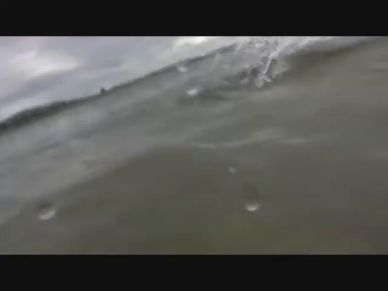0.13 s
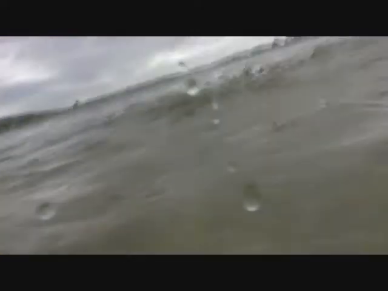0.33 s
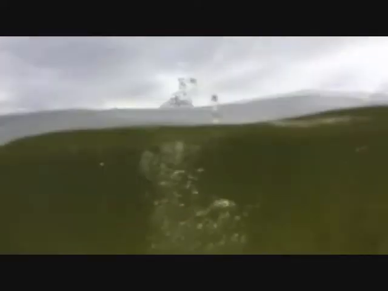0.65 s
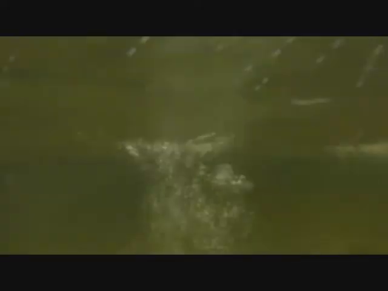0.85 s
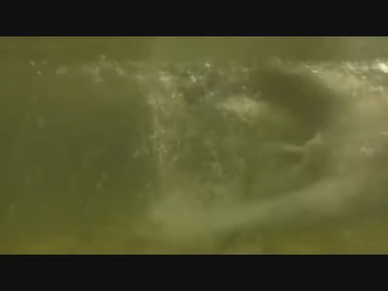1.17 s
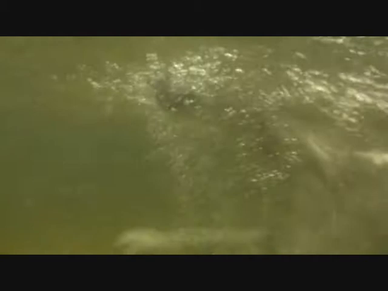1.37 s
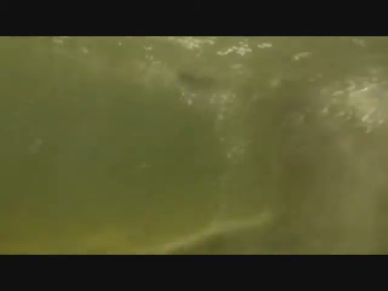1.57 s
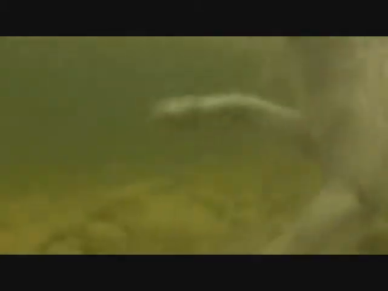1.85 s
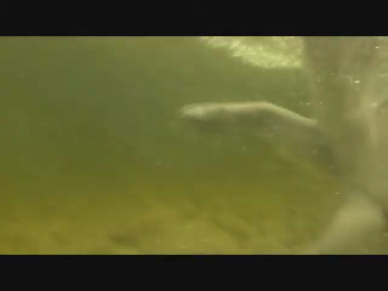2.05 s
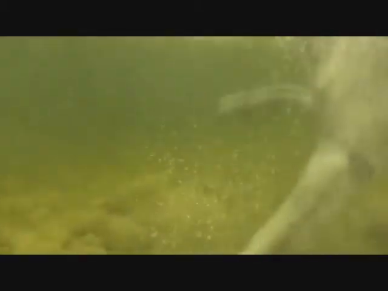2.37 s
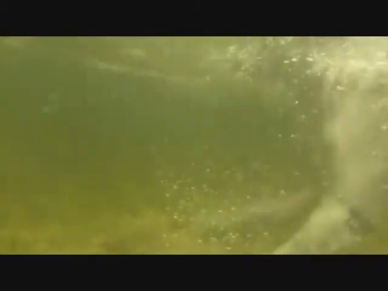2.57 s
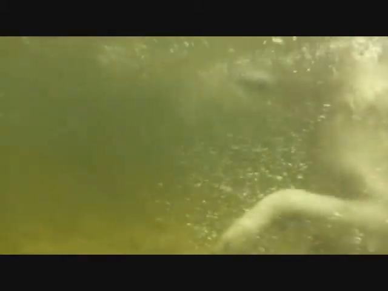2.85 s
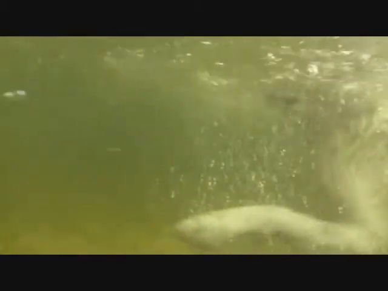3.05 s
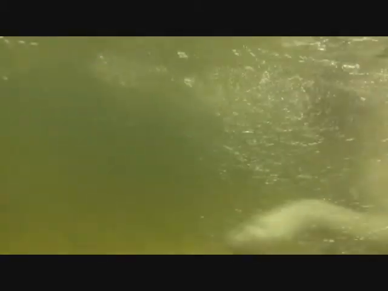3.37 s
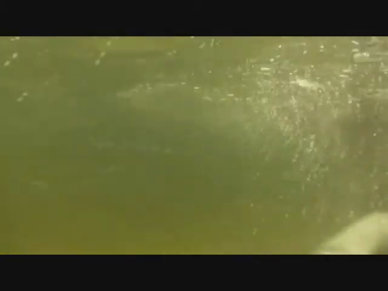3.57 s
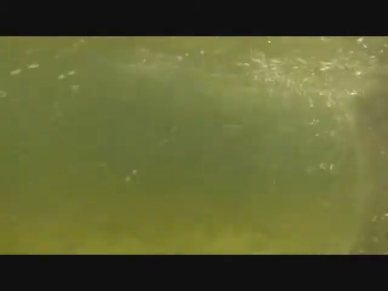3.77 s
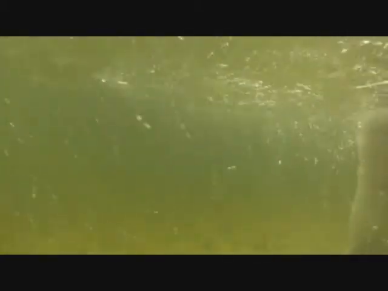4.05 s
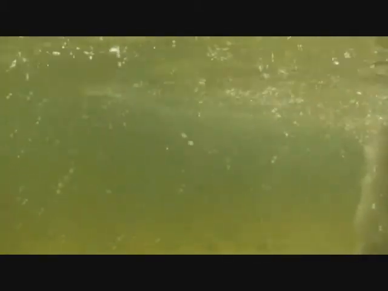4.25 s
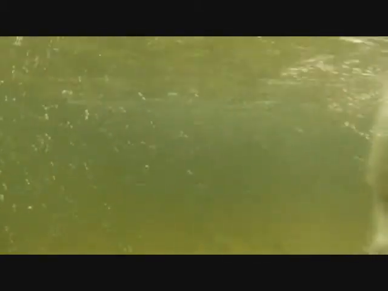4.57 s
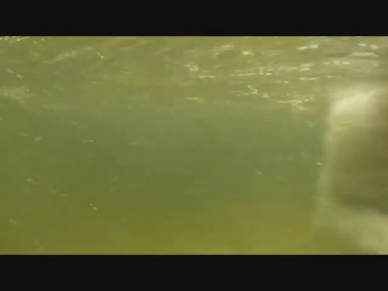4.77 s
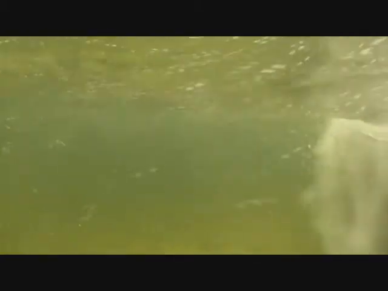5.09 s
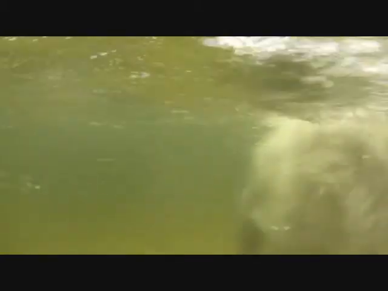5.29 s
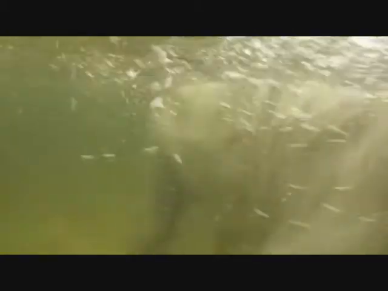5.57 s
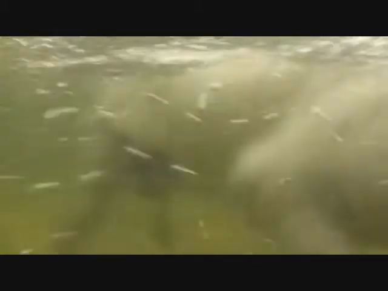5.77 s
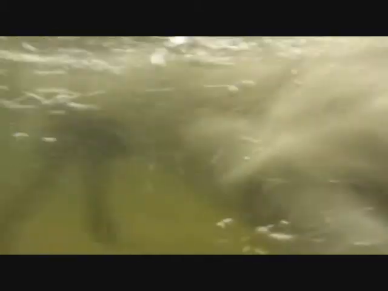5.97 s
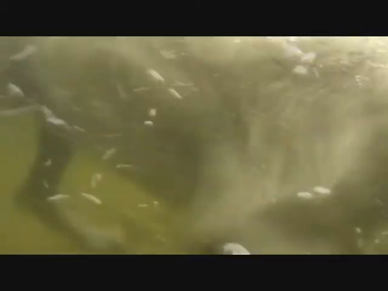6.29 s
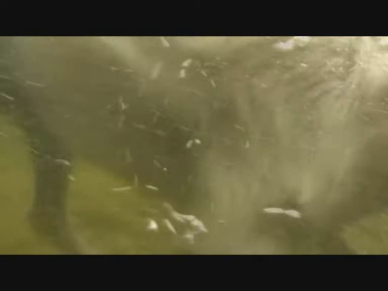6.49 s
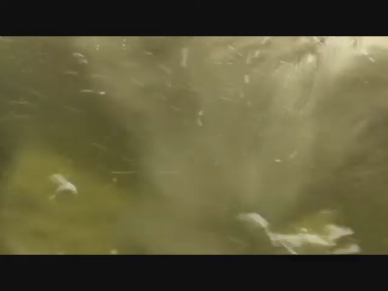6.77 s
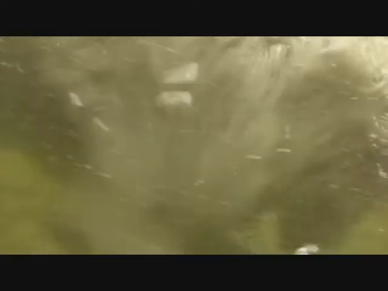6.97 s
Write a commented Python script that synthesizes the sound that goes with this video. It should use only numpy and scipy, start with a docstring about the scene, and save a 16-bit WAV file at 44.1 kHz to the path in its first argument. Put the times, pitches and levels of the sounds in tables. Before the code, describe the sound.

A small camera in a hard housing is dipped into a lake beside a paddling dog. Water slaps the case with hollow, overloaded thuds, then bubbles gulp and fizz as it submerges. One heavy knock follows, then a quiet stretch of dull water hiss with tiny ticks. Finally the dog churns close by, with knocks, gurgles and a very brief dropout.

```python
"""Under a lake surface, a small camera is dipped beside a paddling dog.
Slaps of water and paws knock its housing: noise pushes ring its modes until the input saturates.
Churned water drives the same modes with lumpy noise; large bubbles gulp as gliding sines, clouds of
small ones fizz and single ones tick. Noise and a thin whine lie beneath; the sound drops out once."""
import sys
import numpy as np
from scipy import signal
from scipy.fft import rfft, irfft, next_fast_len
from scipy.io import wavfile
from scipy.ndimage import uniform_filter1d

SR = 44100
rng = np.random.default_rng(int(sys.argv[2]) if len(sys.argv) > 2 else 0)


def materialize(psi):
    """Save the field psi as 16-bit PCM at rate SR to the path in sys.argv[1].

    A 1-D psi becomes a single channel; in a 2-D psi each row is a channel.
    """
    bounded = np.clip(np.atleast_2d(psi).T, -1, 1)
    quanta = np.round(bounded * 32767).astype(np.int16)
    wavfile.write(sys.argv[1], SR, quanta)


N = 314874

# housing modes, one list a part: small fittings, main wall, whole body on its grip, back door,
# side walls, lens port; columns: mode_hz, width_hz, left_gain, right_gain [linear]
HOUSING_MODES = [
    [(3070, 73, 0.36, 0.37), (3960, 130, 2, 1.06), (5000, 2000, 0.64, -0.076), (6600, 390, 0.14, 0.79)],
    [(767, 46.3, 1.0, 1.36), (737, 86, 0.38, 0.56), (866, 8.2, 0.086, 0.31), (637, 85, 0.2, 0.065)],
    [(161.7, 12.8, 0.53, 1.83)],
    [(391.5, 37, 0.73, 1.3), (422, 49, 0.55, 1.6)],
    [(1321, 60, 1, 1.17), (1114, 30, 0.024, 1.53), (1530, 26, 0.76, -0.53), (916, 58, 0.12, 0.061)],
    [(2667, 105, 1.4, 1), (2400, 42, 0.5, -0.91), (2220, 230, 0.082, 0.25), (3008, 51, 0.075, 0.62)],
]


def amp(db):
    """Decibels to linear amplitude."""
    return 10 ** (np.asarray(db) / 20)


def evened(x):
    """Scale to unit RMS."""
    return x / np.sqrt(np.mean(x ** 2) + 1e-20)


def read(points, hz):
    """Interpolate a curve over log frequency."""
    f, value = np.transpose(points)
    return np.interp(np.log(hz + 1), np.log(f + 1), value)


def add(mix, start_s, sound):
    """Mix a sound in at its start, cut at the end of the mix."""
    part = mix[:, round(start_s * SR):][:, :sound.shape[1]]
    part += sound[:, :part.shape[1]]


def kicks(rate_hz, spread_db):
    """Random impulses with exponentially distributed dB levels."""
    level_db = spread_db * np.minimum(rng.exponential(1, N), 5)
    return amp(level_db) * (rng.random(N) < rate_hz / SR)


def decaying(x, decay_s):
    """One-pole exponential decay after each impulse."""
    return signal.lfilter([1], [1, -np.exp(-1 / (decay_s * SR))], x)


def response(modes, size):
    """Push to both microphones: damped resonances, weak far above and below the part's modes."""
    hz = np.fft.rfftfreq(size, 1 / SR)
    ring = 0
    for mode_hz, width_hz, left, right in modes:
        damping = 1j * width_hz * hz
        ring = ring + np.array([[left], [right]]) * damping / (mode_hz ** 2 - hz ** 2 + damping)
    lowest_hz, highest_hz = np.min(modes, axis=0)[0], np.max(modes)
    rise = 1j * hz / (0.33 * lowest_hz)
    return ring / (1 + 1j * hz / (1.545 * highest_hz)) ** 3 * rise / (1 + rise)


def spray(pushes, size):
    """Filter each microphone's own push to the wide treble of spray."""
    # spray colour: freq_hz, gain_db
    colour = [(1500, -5.5), (3500, 6), (6000, 2.5), (9000, -5), (16000, -18.5)]
    gain_db = read(colour, np.fft.rfftfreq(size, 1 / SR))
    return irfft(rfft(pushes, size) * amp(gain_db), size)


def whine():
    """Electronics: thin steady sines at random phase."""
    # lines: freq_hz, left_rms_db, right_over_left_db
    lines = [(7854, -68, 2), (7881, -66, 2), (15735, -57, -5)]
    t, out = np.arange(N) / SR, 0
    for hz, db, right_db in lines:
        tone = np.sqrt(2) * np.sin(2 * np.pi * (hz * t + rng.random()))
        out = out + amp([[db], [db + right_db]]) * tone
    return out


def floor():
    """Still water and hiss: smooth noise, nearly unrelated at the two microphones."""
    # noise colour before levelling: freq_hz, relative_density_db
    colour = [(12, -67), (25, -0.5), (105, -4.5), (159, 4.5), (287, -4.5), (462, 2), (578, -9.5), (765, 0),
              (958, -14.5), (1780, -15), (7010, -20.5), (7630, -19.5), (14500, -24.5), (16300, -18.5)]
    level_db, size = -41.5, next_fast_len(N)
    a, b = rng.standard_normal((2, size))
    pair = np.array([a, b - 0.29 * a])
    gain = amp(read(colour, np.fft.rfftfreq(size, 1 / SR)))
    noise = irfft(rfft(pair) * gain, size)[:, :N]
    return amp(level_db) * amp([[-1.5], [1.5]]) * evened(noise)


def churn_levels():
    """Relative dB of the low walls, side walls and treble at every sample."""
    # churned water: time_s, relative_level_db, treble_over_level_db
    pressure = [(0, -37.5, 4.5), (.34, -44.5, 7), (.45, -17, 5.5), (.85, -30, 4.5), (.95, -41, 7.5),
                (1.1, -27.5, 8), (1.35, -22.5, -4), (1.6, -34, 6.5), (1.85, -38, -5.5), (2.15, -42.5, 4),
                (2.35, -31.5, -3), (2.55, -30.5, -11), (2.85, -47, 2.5), (5.0, -48.5, 4.5),
                (5.12, -35.5, 1), (5.3, -25.5, 0), (6.001, -31, -0.5), (6.45, -26, 3), (6.75, -25.5, 4.5),
                (7.14, -21, 1)]
    side_db, side_share = 1.5, 0.076  # side walls over low walls; their share of the treble
    time_s, *columns = np.transpose(pressure)
    level_db, treble_db = (np.interp(np.arange(N) / SR, time_s, c) for c in columns)
    return np.array([level_db, level_db + side_db + side_share * treble_db, level_db + treble_db])


def drops(size):
    """Small drops of spray: bursts of noise, each drop size in its own band."""
    band_hz, spectrum = np.fft.rfftfreq(size, 1 / SR), 0
    for hz in (2100, 2660, 3300, 3950, 5000, 6400, 8300, 11000):
        bursts = uniform_filter1d(decaying(kicks(35.0, 3.2), 0.006), 130)
        ticks = 0.2 + evened(bursts)
        band = np.exp(-(np.log((band_hz + 1) / hz) / 0.13) ** 2)
        spectrum = spectrum + rfft(ticks * rng.standard_normal((2, N)), size) * band
    return evened(spray(irfft(spectrum, size), size)[:, :N])


def churn():
    """Eddies press on the housing as noise lumped over a few milliseconds; each part hums with it."""
    low_db, side_db, high_db = churn_levels()
    part_db = [high_db - 22.5, low_db - 0.5, low_db - 20.5,
               low_db - 16.5, side_db - 7.0, high_db - 18.0]  # in the order of HOUSING_MODES
    size, out = next_fast_len(N), 0
    stirred = np.clip((low_db + 54.0) / 10, 0, 1)  # calm water presses evenly
    shared = kicks(40.0, 3.5)
    for modes, level_db in zip(HOUSING_MODES, part_db):
        own = kicks(60.0, 0.92)
        eddies = evened(decaying(shared + 13.0 * own, 0.0075))
        lumps = 0.5 + (1 - stirred) + stirred * eddies
        push = lumps * rng.standard_normal(N)
        hum = irfft(response(modes, size) * rfft(push, size), size)
        out = out + amp(level_db) * evened(hum[:, :N])
    return out + stirred * amp(high_db - 14.0) * drops(size)


def fizz(count=36):
    """Bubble cloud: each size rings some cycles at its own gliding pitch, often in quick strings."""
    # cloud colour: pitch_hz, relative_level_db
    colour = [(450, -7), (800, -6), (1300, 4.5), (1900, -6.5), (2700, -1), (4000, -18), (6500, -16.5)]
    level_db, out = churn_levels(), np.zeros((2, N))
    stirred = np.clip((level_db[0] + 50.5) / 11.0, 0, 1)  # calm water holds few bubbles
    for hz, (glide, side) in zip(np.geomspace(420, 7500, count), rng.random((count, 2))):
        turns = np.arange(int(90 * SR / hz)) * hz / SR
        ring = np.sin(2 * np.pi * turns * (1 + 0.00093 * (glide - 0.4) * turns))  # up or down
        blip = ring * np.exp(-turns / (4.6 + hz / 250.0)) * np.minimum(turns / 2.1, 1)
        wander = evened(uniform_filter1d(rng.standard_normal(N // 441 + 1), 8))  # 10 ms steps
        busy = amp(7.0 * wander).repeat(441)[:N]
        births = kicks(16.0 * stirred * busy, 4.56)
        band_db = level_db[np.searchsorted([930, 1700], hz)]
        sound = evened(signal.oaconvolve(births, blip)[:N]) * amp(band_db + read(colour, hz) - 20.5)
        apart = min(hz / 2580.0, 1)  # higher bubbles reach the two microphones unequally
        left = sound * amp(2.0 * apart * (side + 1.5))
        late = np.roll(sound, int(30 * apart * side))
        out += [left, late * amp(7.0 * apart * (1.0 - side))]
    return out


def bubbles():
    """A bubble bursts on the housing: a puff of noise around its pitch and a few cycles of ring."""
    # single bubbles: start_s, relative_level_db, pitch_hz
    bursts = [(0.199, -31, 2770), (0.23, -17.5, 4600), (1.809, -22, 1880), (1.9, -15.5, 1460),
              (1.95, -22, 1400), (2.399, -25, 3180), (2.62, -26, 5500), (0.879, -11, 3200),
              (1.069, 2, 3130), (1.555, -13, 2970), (2.382, -30, 3560), (2.619, -25, 2350),
              (3.802, -30, 8200), (3.836, -32.5, 2620), (4.469, -35, 7600), (4.494, -33, 5020),
              (4.83, -33.5, 4000), (5.393, -14.5, 5130), (5.23, -10, 2204), (5.541, -10.5, 3270),
              (6.041, -13.5, 2640), (6.146, -17, 2730), (6.183, -14, 3920), (6.568, -14, 3820),
              (1.179, -5, 2650), (1.235, -4, 7620), (1.287, -16, 2700), (1.452, 1, 1860),
              (1.461, -8.5, 4970), (1.53, -14, 2680), (1.61, -14, 2720), (1.637, -2.5, 2610),
              (1.371, -10, 3300), (1.68, -22, 4600), (1.746, -14.5, 2070), (1.773, -19, 2500),
              (1.886, -17.5, 1630), (2.3625, -33, 4000), (2.3994, -19.5, 2020), (2.4344, -24, 1880),
              (2.655, -21.5, 2520), (3.0609, -29.5, 7860), (3.0734, -14.5, 5050), (3.1033, -19, 1850),
              (3.1507, -17.5, 4760), (3.238, -22, 2840), (3.298, -21.5, 3250), (3.6494, -27, 3700),
              (3.681, -29, 6400), (3.703, -22.5, 7280), (4.04, -19.5, 2713), (4.655, -21.5, 4190),
              (5.052, -29, 4130), (5.348, -11, 3900), (5.435, -13, 1835), (5.51, -12.5, 2720),
              (5.715, 0, 3200), (5.987, -9, 2580), (6.0757, -12, 2310), (6.216, -14, 3760),
              (6.372, -19.5, 2720), (6.3981, -19, 2750), (6.5964, -5, 3860), (6.343, -19, 3980),
              (6.532, -13, 3800), (6.548, -18, 3860), (6.615, -13, 5040), (6.672, -3, 2600),
              (6.709, -16, 3700), (6.865, -2.5, 4170)]
    size, rise_s, ring_s, puff_s = 2048, 0.00057, 0.0057, 0.0051
    out, t, band_hz = np.zeros((2, N)), np.arange(size) / SR, np.fft.rfftfreq(size, 1 / SR)
    for (start_s, db, hz), noise in zip(bursts, rng.standard_normal((len(bursts), 2, size))):
        width = 0.26 * (hz / 2500) ** 0.3  # small bubbles burst wider
        puff = irfft(rfft(noise) * np.exp(-(np.log((band_hz + 1) / hz) / width) ** 2))
        ring = np.sin(2 * np.pi * hz * t * (1 + 1.0 * t))
        burst = 0.4 * ring * np.exp(-t / ring_s) + 0.35 * evened(puff) * np.exp(-t / puff_s)
        add(out, start_s, amp(db) * np.minimum(t / rise_s, 1) * burst)
    return out


def gulps():
    """Large bubbles against the housing: near sines that swell, glide and fade, wavering in pitch."""
    # gulps: start_s, peak_db before panning, pitch_hz, fade_ms (to -9.2 dB)
    events = [(0.797, 4.5, 1517, 7.5), (0.803, -10.5, 1140, 19), (0.842, -6, 1140, 11),
              (1.129, -0.5, 1330, 10), (1.153, -14, 499, 27), (1.193, -4, 1107, 11),
              (1.232, -10, 1340, 9.4), (1.316, -5, 783, 15.5), (1.323, -18, 408, 20),
              (1.504, -12.5, 750, 16), (1.534, -17, 1370, 15), (1.592, -7, 745, 18),
              (1.67, -14.5, 1318, 18), (1.772, -12, 1200, 8.7), (2.228, -24, 784, 9.1),
              (2.409, -15.5, 1317, 14), (2.645, -21, 1113, 21), (2.705, -23.5, 1460, 7.4),
              (2.365, -14, 686, 17), (1.112, -16, 380, 6.5), (1.215, -9, 530, 8), (1.398, -8, 1330, 14),
              (1.46, -15.5, 420, 13), (2.32, -21, 770, 33), (2.452, -29.5, 510, 33), (2.475, -22, 800, 32),
              (2.564, -29, 1300, 11.3), (6.519, -17.5, 370, 38), (2.411, -16, 783, 10),
              (5.263, -16, 685, 14), (5.338, -14, 1090, 17), (5.5, -21, 820, 9), (5.724, -8.5, 946, 8.5),
              (5.756, 2, 383.5, 6.4), (5.927, -5.5, 363, 47), (5.82, 3, 386, 21), (5.95, -16, 770, 27),
              (6.035, -18.5, 1340, 22), (6.055, -19, 865, 21), (6.129, -13, 1395, 8.6),
              (5.985, -14.5, 1117, 33.2), (6.044, -17, 2480, 12), (6.247, 5.5, 777, 29),
              (6.293, -4.5, 773, 26), (6.325, -17.5, 1329, 84), (6.438, -11.5, 800, 39),
              (6.431, -15.5, 354, 30), (6.488, -14, 1322, 30), (6.522, -11.5, 753, 63),
              (6.525, -13.5, 1312, 37), (6.524, -8, 939, 28), (6.684, -19, 388, 41),
              (6.727, -12.5, 774, 19), (6.745, -10, 750, 10), (6.763, -9, 730, 8.8),
              (6.774, -10.5, 745, 6.4), (6.785, 3.5, 746, 14), (6.808, 6, 761, 7.3), (6.825, -16, 740, 12),
              (6.842, -8.5, 750, 5.5), (6.928, 2.5, 746.5, 35), (6.973, -4, 1314, 29),
              (7.017, -17, 1363, 76), (7.062, -15, 921, 9.2), (7.124, -4.5, 1340, 15.2),
              (7.041, -3.5, 900, 9.1)]
    # balance: pitch_hz, left_over_right_db
    balance = [(370, -4), (760, -1.5), (950, -4), (1110, -13), (1300, -6), (1540, 19), (2400, -17)]
    swell_ms, glide_share, waver_share = 2.2, 0.041, 0.0075  # largest glide, RMS waver
    out, t = np.zeros((2, N)), np.arange(9000) / SR
    for (start_s, db, pitch_hz, fade_ms), noise in zip(events, rng.standard_normal((len(events), len(t)))):
        past_ms = t * 1000 - swell_ms
        swell, fade = (past_ms / swell_ms) ** 2, np.abs(past_ms / fade_ms) ** 1.34
        level_db = db - 9.2 * np.where(past_ms < 0, swell, fade)
        glide = glide_share * np.tanh(noise[0]) * np.clip(2 * past_ms / fade_ms - 1, -1, 1)
        waver = waver_share * evened(uniform_filter1d(noise, 250))
        hz = pitch_hz * (1 + glide + waver)
        tone = np.minimum(t / 0.001, 1) * np.sin(2 * np.pi * np.cumsum(hz) / SR)
        pan_db = read(balance, pitch_hz)
        add(out, start_s, amp(level_db) * tone * amp([[min(pan_db, 0)], [min(-pan_db, 0)]]))
    return out


def knocks(size=8192):
    """Each knock is a sharp step of noisy pressure that dies away; every housing part rings to it."""
    # knocks, levels relative: time_s, strength_db, brightness_db, depth_db, side_over_main_db, push_ms
    events = [(0.026, -6.5, -1.5, -17, -11, 5.5), (0.052, 0.5, -6, -3.5, -7.5, 5.9),
              (0.062, -7, 1, -6.5, -5.5, 7.3), (0.139, -20, -3, -14, -2.5, 8),
              (0.214, -24, -5, -9, -24, 8.3), (0.273, -41.5, -16.5, -12, 9, 5.5),
              (0.367, -24.5, -6, -12, 8.5, 3.6), (0.384, -22.5, 6.5, -2.5, 6, 14),
              (0.407, -9, 5.5, -15, 8, 21), (0.42, 1, -9, -17, 2, 12), (0.454, -14.5, 2.5, -13, 1, 16),
              (0.48, 7.5, -11.5, -20, -11, 3.1), (0.502, -3.5, -6.5, -9.5, -4, 8),
              (0.521, -14.5, 5, -11, -14, 3.7), (0.531, -5.5, -20, -23, -11.5, 6.7),
              (0.572, 5.5, -10.5, -26, -11, 4.8), (0.612, -4, -12, -23, -8, 5.9),
              (0.647, 6, -11, -34, -6, 8.6), (0.681, -11, -11, -29, -11, 2.4),
              (0.7, -4, -12.5, -26, -3, 8.1), (0.712, 0.5, -16.5, -17, -13, 9.1),
              (0.748, -12, -11, -24, -6, 6.3), (0.77, 2, -8.5, -32, -6.5, 8.6),
              (0.826, -23, -7.5, -13, 9, 6.5), (0.877, -23.5, -8, -21, -4, 5.4),
              (0.908, -23, -27, -28, -21, 10), (0.979, -5.5, -4, -15.5, -10, 3.3),
              (1.022, -4.5, -1.5, -17, -4, 8.5), (1.057, -11, -8, -22, -4.5, 7.1),
              (1.069, -7, -1.5, -22, -5.5, 5.1), (1.115, -24.5, -9, -22, 7, 7.5),
              (1.15, -10.5, -13, -31, -5, 13), (1.175, -8.5, -9.5, -28, -6, 23),
              (1.218, -12.5, -3, -43, -2, 5.6), (1.378, -12, 1.5, -33, 2, 6.4),
              (1.397, -18, 1, -31, 10.5, 10.4), (1.454, -11, -4.5, -29, -7, 5.6),
              (1.553, -13, -21.5, -27, -12, 8.7), (1.598, -17.5, -9, -35, -7, 5),
              (1.639, -35.5, -21, -31, 9.5, 16), (1.744, -26.5, -24, -29, -4, 14),
              (2.041, -26, -3, -19, -1.5, 11.6), (2.158, -45.5, 17.5, 1, 27, 6.1),
              (2.192, 10.5, -11, -29.5, -13, 9.6), (2.224, -10.5, -26, -19, -17, 11),
              (2.264, -3.5, -16, -12.5, -10.5, 9.3), (2.596, 1, -15, -18, -12.5, 4.8),
              (4.041, -31, -12, -23, -9.5, 5.2), (5.32, -21.5, 3.5, -34, 3, 6.5),
              (5.331, -21.5, 5, -23, 15, 8), (5.392, -18, -10, -33, -8, 5.7),
              (5.544, -24.5, -4, -13, -14, 44), (5.575, -0.5, -8, -12, -7.5, 9.8),
              (5.641, -23, 6, -4, 6, 9.1), (5.694, -22, 9, 2, 7, 6.4), (5.759, -3.5, -6, -23.5, -9, 4.6),
              (5.819, 8.5, -7.5, -17, 3.5, 15), (5.921, -4, -9, -25.5, -4.5, 7),
              (6.099, -19.5, -5.5, -13, -7, 6.6), (6.116, -23, -2, -25, 2.5, 13),
              (6.241, -4, -13.5, -24, -14, 13), (6.268, 1, -13, -18, -9, 8.8),
              (6.286, 1, -18.5, -13, -17, 18), (6.427, -18.5, -17, -21, -17, 6.4),
              (6.516, -10, -16, -37, -5, 6.9), (6.668, -21, 6.5, -36, 9.5, 8.6),
              (6.856, -15.5, -8, -31, -17, 7.9), (6.926, 3, -13, -38, -3.5, 8.7),
              (6.943, -5.5, -7.5, -21, 0.5, 25), (7.061, -20, -18, -28, 1, 28),
              (7.08, -1, -12, -31, -6.5, 15), (7.111, 3, -13.5, -19, -7, 8)]
    # answer of each housing part: offset_db, brightness_share, depth_share, side_share [dB per dB]
    answer = np.array([(-1.5, 0.7, 0.074, 0.18), (-1.5, -0.13, 0.13, -0.2), (-0.5, 0.062, 0.94, -0.00023),
                       (-7, -0.14, 0.54, -0.086), (-1.5, -0.48, 0.11, 0.98), (0, 1.28, 0.1, -0.22)])
    out, t = np.zeros((2, N)), np.arange(size // 2) / SR
    parts = np.array([response(modes, size) for modes in HOUSING_MODES])
    noises = rng.standard_normal((len(events), 10, size // 2))
    for (time_s, strength_db, *colour_db, push_ms), noise in zip(events, noises):
        decay = np.exp(-(t * 1000 / max(push_ms, 0.3)) ** 1.15)
        push = noise * decay * np.minimum(t / 0.0012, 1)
        rings = irfft(parts * rfft(push[:6], size)[:, None], size)
        # froth is uneven in time and pitch
        crackle, patches = (amp(3.5 * evened(uniform_filter1d(row, size=100))) for row in noise[8:])
        froth = push[6:8] * crackle * np.minimum(t / 0.0035, 1)
        froth = irfft(rfft(froth, size) * np.append(patches, 1), size)
        rings[0] += 0.4 * np.roll(spray(froth, size), 20, axis=1)  # joins the small fittings
        power = uniform_filter1d((rings ** 2).mean(1), 220, axis=1)
        peak = np.sqrt(power.max(1))
        part_db = strength_db + answer @ [1, *colour_db]
        knock = np.tensordot(amp(part_db) / peak, rings, 1)
        add(out, time_s - 0.001, knock[:, :size * 3 // 4])
    return out


def scene():
    """Sum of all layers at both microphones."""
    return floor() + whine() + churn() + fizz() + bubbles() + gulps() + knocks()


def record(dry):
    """The input saturates with a rounded knee, drops out for a moment, and is band limited."""
    # dropout: start_s, end_s
    start_s, end_s = (5.829, 5.922)
    knee, edge_hz = 0.59, 16050
    saturated = dry / (1 + np.abs(dry / knee) ** 5.25) ** (1 / 6.18)
    since_s = np.arange(N) / SR - start_s
    gone = (since_s > 0) & (since_s < end_s - start_s)
    trace = amp(-13.5 - 1300.0 * np.maximum(since_s, 0))  # fades at 1300 dB/s
    kept = np.where(gone, trace, 1)
    lowpass = signal.firwin(511, edge_hz, window=("kaiser", 9), fs=SR)
    return signal.oaconvolve(saturated * kept, lowpass[None], "same")


dry = scene()
out = record(dry)
materialize(out)
```